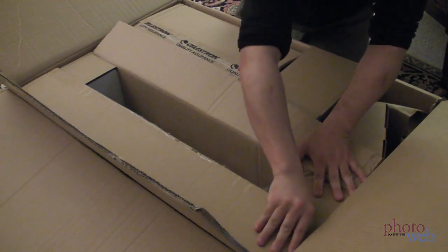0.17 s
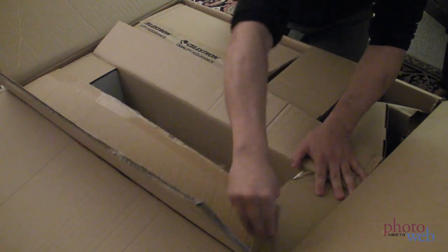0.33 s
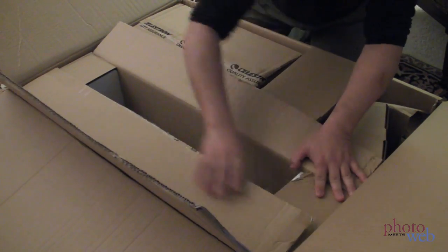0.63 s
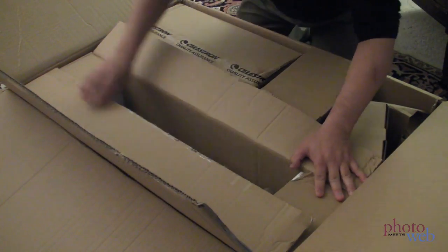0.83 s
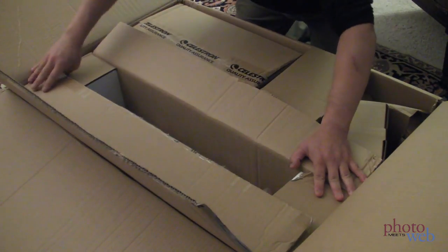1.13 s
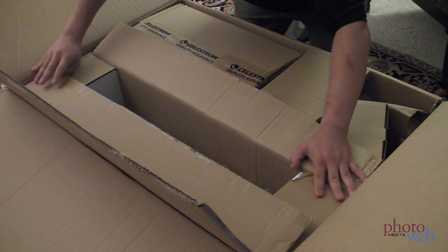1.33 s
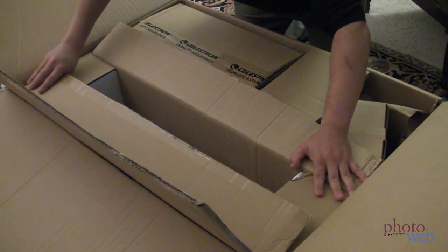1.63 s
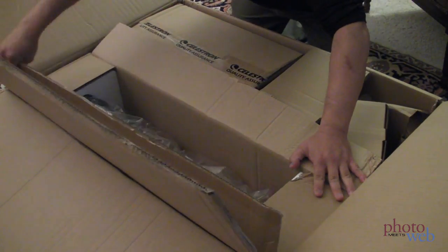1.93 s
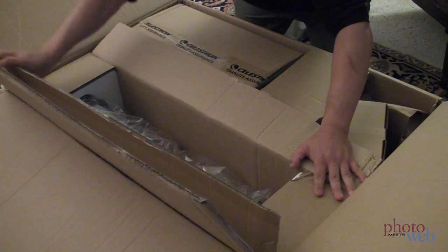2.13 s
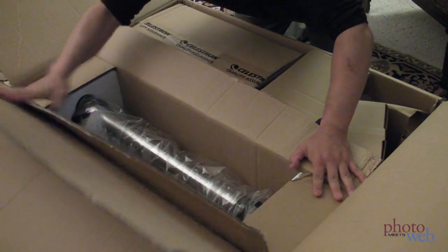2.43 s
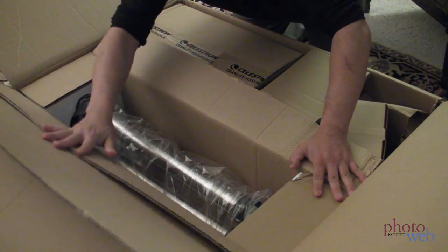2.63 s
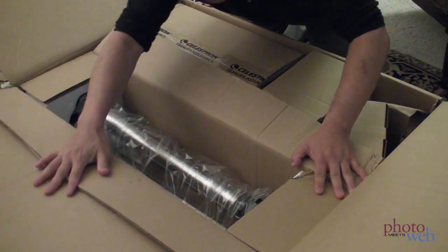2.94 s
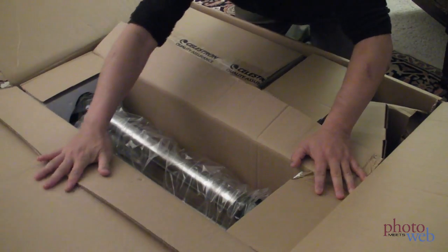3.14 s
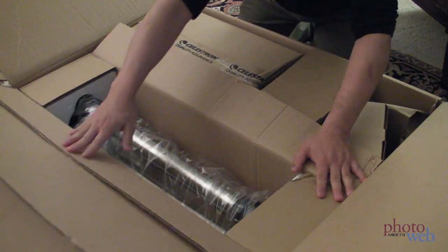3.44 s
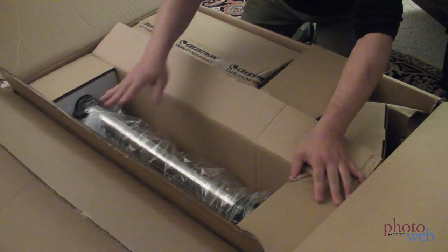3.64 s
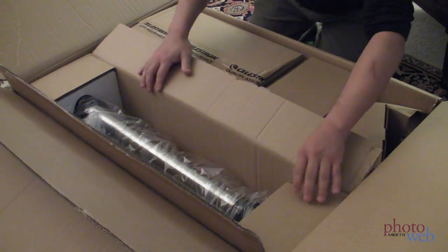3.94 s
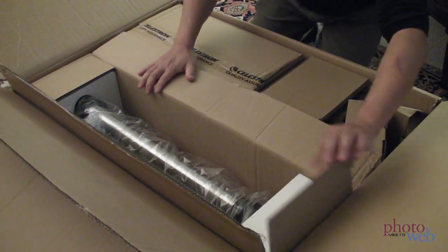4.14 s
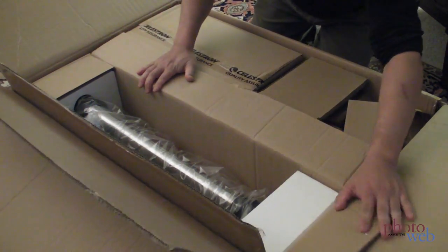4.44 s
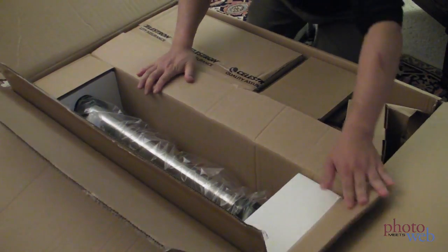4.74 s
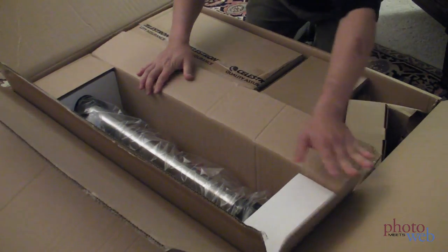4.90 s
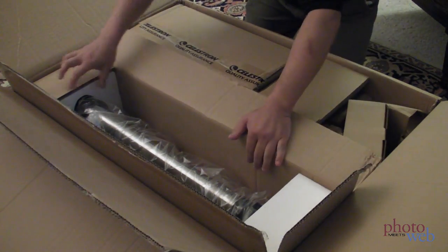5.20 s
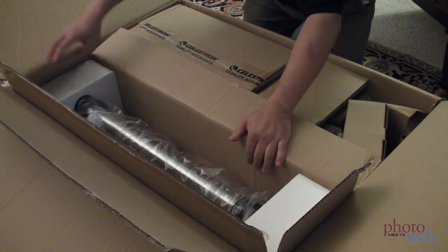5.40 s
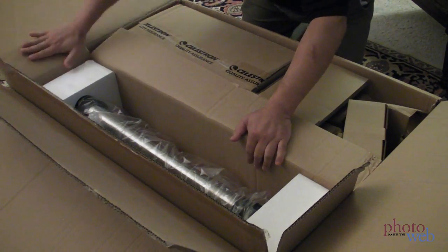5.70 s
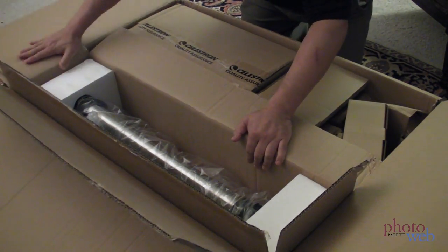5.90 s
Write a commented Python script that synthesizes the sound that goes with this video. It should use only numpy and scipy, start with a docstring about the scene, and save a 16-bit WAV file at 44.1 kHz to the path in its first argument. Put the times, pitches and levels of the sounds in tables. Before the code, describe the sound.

A big cardboard box is opened by hand, heard close. Uneven rubbing strokes carry a papery hiss and hollow boom throughout. Two abrupt boxy cracks, near the start and just before two seconds, shake the flaps. Later come duller thumps, a short falling scrape and bright edge scuffs, with short room reverberation and faint background noise.

```python
"""Opening a cardboard box

Hands open the inner flaps of a large cardboard box, close by in a small room. Sliding board and palms
are noise-like friction; two flaps snap free with loud pops and fingers knock, as ringing panel modes.
Freed flaps rattle in dense collisions, an edge scrapes and scuffs, tape crackles in tiny high ticks,
and a tight edge squeaks by stick and slip. Diffuse reverberation and steady noise lie behind."""
import sys
import numpy as np
from scipy import signal
from scipy.fft import rfft, irfft, next_fast_len
from scipy.io import wavfile
from scipy.ndimage import uniform_filter1d

SR = 44100
rng = np.random.default_rng(int(sys.argv[2]) if len(sys.argv) > 2 else 0)


def dump(signal):
    """Clip the signal to [-1, 1] and save it as 16-bit WAV at the path in sys.argv[1]."""
    limited = np.clip(np.atleast_2d(signal).T, -1, 1)
    pcm = np.round(limited * 32767).astype(np.int16)
    wavfile.write(sys.argv[1], SR, pcm)


N = 267362
TIME = np.arange(N) / SR


def amp(db):
    """Logarithmic level: decibels to amplitude gain."""
    return 10 ** (np.asarray(db) / 20)


def unit(x):
    """Normalisation: scales to rms 1."""
    return x / np.sqrt(np.mean(x ** 2) + 1e-20)


def read(points, hz):
    """Interpolation: reads a (Hz, value) table on a log-frequency axis."""
    f, value = np.transpose(points)
    return np.interp(np.log(hz + 1), np.log(f), value)


def add(mix, s, sound):
    """Superposition: adds a sound into the mix, in place, at time s."""
    part = mix[max(round(s * SR), 0):][:len(sound)]
    part += sound[:len(part)]


def colour(x, spectrum):
    """Linear filtering: weights the spectrum by a table; rms 1."""
    size = next_fast_len(len(x))
    gain = amp(read(spectrum, np.fft.rfftfreq(size, 1 / SR)))
    return unit(irfft(rfft(x, size) * gain, size)[:len(x)])


def wander(per_s):
    """Random modulation: a smooth curve with about per_s new values a second."""
    return unit(np.interp(TIME * per_s, np.arange(N), rng.standard_normal(N)))


def resonate(x, hz, width):
    """Heterodyne resonance along the curve hz: shift down to zero, smooth, shift back."""
    turn = np.exp(2j * np.pi * np.cumsum(hz) / SR)
    r = np.exp(-np.pi * width / SR)
    return 2 * (turn * signal.lfilter([1 - r], [1, -r], x / turn)).real


def slips(per_s, spread_db, smooth, judder_db, judder_per_s):
    """Stick-slip friction: fibres let go in unequal slips, bunched by the judder of the hand."""
    sizes = amp(spread_db * np.minimum(rng.exponential(1, N), 4)) * rng.choice([-1, 1], N)
    grains = unit(sizes * (rng.random(N) < per_s / SR))
    judder = amp(judder_db * wander(judder_per_s))
    return (grains + smooth * rng.standard_normal(N)) * judder


# Colours of rubbed cardboard: coarse rasp, flexing boom, surface hiss and finest fizz.
# Each row: frequency in Hz, relative spectral level in dB per Hz.
RASP_COLOUR = [(250, -32), (450, -0.5), (650, 0), (900, -2), (1300, -3), (1800, -6.5), (2200, -10.5),
               (2700, -18.5), (4500, -21.5)]
BOOM_COLOUR = [(30, -50), (60, -52), (90, -14), (125, 0), (165, 4.5), (260, -3), (360, -0.5), (460, -7),
               (750, -37)]
HISS_COLOUR = [(1800, -15.5), (2900, -9.5), (4000, -1.5), (5200, 1.5), (6800, 2.5), (9000, -0.5),
               (10500, -2.5), (13000, -11)]
FIZZ_COLOUR = [(7500, -64.5), (9600, -2), (10600, 2), (12500, 5.5), (14500, 11), (16000, 6.5)]


def rubbing():
    """Friction radiation: coarse slips shake the panel, fine ones hiss straight off the surface."""
    (rasp, boom, hiss, fizz), (deep_hz, hollow_hz) = strokes()
    coarse = slips(1100, spread_db=1.0, smooth=0.62, judder_db=1.5, judder_per_s=75)
    fine = off_hand(slips(6000, spread_db=4.0, smooth=0.89, judder_db=1.5, judder_per_s=150))
    body = rasp * through_panel(coarse, RASP_COLOUR, hollow_hz, width_hz=370, gap_db=1)
    flex = boom * through_panel(coarse, BOOM_COLOUR, deep_hz, width_hz=133, gap_db=11.5)
    return body + flex + hiss * colour(fine, HISS_COLOUR) + fizz * colour(fine, FIZZ_COLOUR)


# Strokes of palm or board over board. Each row: start in seconds, rise in seconds, fall in seconds,
# levels at full speed of rasp, boom, hiss and fizz in dB, then the deep and the hollow resonance
# of the air gap beneath in Hz, before drift.
STROKES = [ (-.03, 0.028, .13, -41.5, -44.5, -54.5, -54, 288, 760),
           (.03, 0.045, 0.17, -49.5, -49, -51, -48, 340, 710),
           (.12, 0.075, 0.049, -47.5, -54, -54, -49, 375, 915),
           (0.243, .01, 0.062, -50, -51, -59.5, -65, 291, 894),
           (.295, 0.08, 0.018, -32, -43, -40.5, -42, 280, 870),
           (0.368, 0.051, 0.14, -36.5, -57, -49, -48, 261, 890),
           (.53, 0.071, 0.093, -51, -66, -51, -46.5, 373, 825),
           (.66, 0.068, 0.066, -81, -79, -63, -49.5, 298, 765),
           (0.851, 0.025, 0.047, -50.5, -63, -57, -50, 293, 614),
           (.96, 0.019, 0.11, -60, -51, -61, -46, 248, 633),
           (1.05, 0.054, 0.03, -46, -53, -51, -48, 220, 706),
           (1.169, 0.0045, 0.019, -50, -74, -56, -63, 240, 704),
           (1.213, 0.018, 0.075, -48, -49.5, -51.5, -56, 260, 670),
           (1.354, 0.016, 0.2, -50, -50, -75, -53, 286, 665),
           (1.477, 0.039, 0.13, -46.5, -46, -49, -44.5, 315, 586),
           (1.63, 0.052, 0.036, -49.5, -62, -53.5, -48, 274, 800),
           (1.779, 0.033, 0.053, -39.5, -43, -43, -35, 340, 760),
           (1.87, 0.071, 0.071, -45.5, -48, -45.5, -43, 290, 740),
           (2.035, 0.035, 0.075, -52.5, -52.5, -63, -48.5, 256, 820),
           (2.14, 0.07, 0.065, -48, -56.5, -53.5, -48, 223, 1130),
           (2.274, .065, 0.33, -48, -53, -53.5, -47, 260, 1030),
           (2.424, 0.053, 0.068, -40, -38, -43, -36, 312, 593),
           (2.449, 0.14, 0.11, -49, -46, -40.5, -32.5, 192, 674),
           (2.63, 0.067, 0.19, -55.5, -57, -49.5, -42, 290, 720),
           (2.719, 0.079, 0.16, -43.5, -48, -54, -69, 328, 784),
           (2.938, .10, 0.022, -44.5, -47, -51, -50, 334, 820),
           (3.152, 0.054, 0.066, -47, -50.5, -56.5, -62, 330, 694),
           (3.2, 0.11, 0.043, -43.5, -53, -49.5, -51, 340, 690),
           (3.344, 0.056, .10, -42, -46.5, -47, -46.5, 380, 760),
           (3.493, 0.036, 0.15, -48, -50, -49.5, -43, 362, 674),
           (3.641, .015, 0.033, -54, -42, -52, -48, 194, 630),
           (3.62, 0.091, 0.14, -46, -61, -49, -51, 241, 800),
           (3.745, 0.021, 0.035, -48, -39.5, -48.5, -41.5, 315, 620),
           (3.808, 0.037, 0.069, -50, -42.5, -45.5, -45.5, 260, 607),
           (3.89, 0.036, 0.086, -53, -65, -52.5, -55, 260, 625),
           (3.978, 0.087, 0.14, -51, -59, -56, -70, 323, 567),
           (4.215, 0.072, 0.062, -47.5, -50, -55.5, -60, 295, 790),
           (4.299, 0.12, 0.07, -44.5, -53.5, -47.5, -48.5, 275, 696),
           (4.42, .13, 0.074, -46, -51.5, -52, -67, 356, 544),
           (4.635, 0.022, 0.17, -49.5, -51.5, -52, -58, 340, 600),
           (4.679, 0.079, 0.15, -47, -54.5, -49, -51.5, 315, 614),
           (4.86, 0.11, 0.13, -51, -55.5, -51, -46, 292, 694),
           (5.034, 0.068, 0.074, -47.5, -56, -43.5, -40.5, 288, 660),
           (5.14, 0.036, 0.035, -52, -52.5, -67, -70, 325, 656),
           (5.279, 0.019, 0.036, -46.5, -47, -55, -57, 190, 754),
           (5.309, 0.025, 0.046, -44.5, -46, -51, -40, 184, 855),
           (5.35, 0.04, 0.29, -57, -50.5, -57.5, -60, 188, 1030),
           (5.6, 0.054, .03, -53, -53, -48.5, -47, 255, 750),
           (5.655, 0.021, 0.03, -37, -40.5, -41.5, -48, 252, 750),
           (5.66, 0.043, 0.13, -45.5, -48.5, -47, -45, 310, 720),
           (5.76, 0.061, 0.075, -46.5, -48.5, -53, -62, 238, 890),
           (5.872, 0.031, 0.083, -43.5, -49, -50, -51.5, 235, 1110),
           (5.969, 0.093, .12, -45.5, -54, -48, -48.5, 330, 990)]
# Friction while the hands only lean on the board. One row: rasp, boom, hiss and fizz levels in dB.
REST_DB = (-93, -66.5, -67.5, -66)
# Growth with speed. One row: exponents of the speed for rasp, boom, hiss and fizz.
SPEED_LAW = (0.94, 1.25, 1.03, 0.98)


def strokes(gap_drift=0.037):
    """Power law of friction: loudness follows one arch of speed per stroke, and powers add.

    Returns the four friction amplitudes and the air gap's two resonances in Hz."""
    power = amp(REST_DB)[:, None] ** 2 * np.ones(N)
    exponents = np.array(SPEED_LAW)[:, None]
    for start, rise, fall, *db, _, _ in STROKES:
        on = (TIME > start) & (TIME < start + rise + fall)
        arch = np.interp(TIME[on] - start, [0, rise, rise + fall], [0, 1, 0])
        speed = np.sin(np.pi / 2 * arch)
        power[:, on] += (amp(db)[:, None] * speed ** exponents) ** 2
    start, rise, *_, deep_hz, hollow_hz = np.transpose(STROKES)
    drift = np.exp(gap_drift * wander(16))
    gaps = [drift * np.interp(TIME, start + rise, hz) for hz in (deep_hz, hollow_hz)]
    return np.sqrt(power), gaps


def through_panel(x, spectrum, gap_hz, width_hz, gap_db):
    """Coupled resonance: friction shakes the board, and the air gap beneath it resonates."""
    board = colour(x, spectrum)
    return unit(board + amp(gap_db) * resonate(board, gap_hz, width_hz))


def off_hand(x, delay_s=0.000425, sway=0.41, echo_db=-9):
    """Comb filtering: the moving hand mirrors the hiss a moment later, with drifting notches."""
    delay = delay_s * np.exp(sway * wander(7))
    return unit(x + amp(echo_db) * np.interp(TIME - delay, TIME, x))


# Flaps snapping free and knocks on the panels. Each row: start in seconds, peak level of the ring in dB,
# centre of the ring in Hz, its spread in octaves, crack level relative to the ring in dB before halving.
KNOCKS = [ (.146, -27, 920, 0.72, -25), (.183, -24.5, 1000, 0.32, -24), (0.203, -32.5, 1070, 0.72, -21),
          (.333, -3, 1120, 0.51, 4.5), (.336, -5, 250, 0.77, 8), (.373, -13.5, 1080, 0.69, -7),
          (.624, -32, 990, 0.45, -18), (.776, -36, 930, 0.66, -4), (.958, -28.5, 900, .8, -31),
          (.962, -23.5, 1040, 0.39, -27), (0.9627, -17.5, 290, 0.96, -22), (.976, -30.5, 600, 0.53, -24),
          (1.025, -40, 696, .6, -16), (1.069, -32, 856, 1, 3), (1.222, -40.5, 600, 1.9, -10),
          (1.307, -35.5, 890, 1.1, -4), (1.448, -37, 1130, 0.7, -14), (1.51, -26, 410, 1.2, 6.5),
          (1.821, 3, 930, 0.9, -2), (2.102, -38, 920, 1.1, -21), (2.483, -24, 370, .5, -25),
          (2.97, -36, 800, 1.4, -7), (3.383, -30, 366, 0.25, -17), (3.648, -27, 520, 0.89, -24),
          (3.78, -24.5, 293, .66, -26), (3.812, -16, 464, 0.34, -5), (3.841, -28, 606, .73, -16),
          (5.074, -34, 708, 1.16, 6), (5.246, -36.5, 700, 1.4, -12), (5.287, -31.5, 193, .88, 0),
          (5.39, -36, 1210, 0.47, 2), (5.428, -33, 990, 0.46, -6), (5.524, -35.5, 444, 1.2, -20),
          (5.561, -33, 960, 0.76, -16), (5.659, -31.5, 400, 0.61, -15), (5.793, -30, 1160, 0.68, -1)]


def knocks():
    """Impact excitation: each blow sets a panel ringing in its own range of modes."""
    mix = np.zeros(N)
    for start, db, *blow in KNOCKS:
        add(mix, start, amp(db) * knock(*blow))
    return mix


# Bending modes of the box panels. Each row: frequency in Hz, level in dB before the blow's weighting,
# time to decay by 60 dB in seconds.
PANEL_MODES = [(100, 4, 0.062), (134.7, -9.5, 0.155), (173, -3, 0.081), (238.5, 0, 0.036),
               (371.6, 1.5, 0.047), (499, 1, 0.028), (636, 5, 0.034), (845, 2, 0.026), (1088, -1, 0.021),
               (1139, 1, 0.029), (1350, -3.5, 0.034), (1432, 0.5, 0.02), (1790, 6, 0.013),
               (2210, -3, 0.014)]
# The crowd of higher, overlapping modes, and the crack of breaking fibres.
# Each row: frequency in Hz, relative spectral level in dB per Hz (the crowd's before the blow's weighting).
CROWD_COLOUR = [(30, -41), (90, -19), (150, 18), (1000, 10), (1800, -32.5), (2600, -3), (4500, -5.5),
                (9000, -7), (15000, -37)]
CRACK_COLOUR = [(30, -49), (300, -36), (1500, 13), (2800, -9), (4500, 2), (9000, -5.5), (15000, 0)]


def knock(centre_hz, octaves, crack_db, travel_s=0.00047, crowd_db=-11, crowd_s=0.0059,
          crack_s=0.0015, leak_hz=125):
    """Modal ringing with dispersion: bending waves arrive treble first; fibres crack at the start."""
    t = np.arange(SR // 6) / SR
    hz, db, t60 = np.transpose(PANEL_MODES)[:, :, None]

    def favour(f):
        """Selective excitation: modes far from the centre receive less."""
        return 1 / (1 + (np.log2(f / centre_hz) / octaves) ** 2)

    age = np.maximum(t - travel_s * np.sqrt(1000 / hz), 0)
    sides = (-1) ** np.arange(len(PANEL_MODES))[:, None]  # neighbours push the air in opposite senses
    modes = sides * favour(hz) * amp(db - 60 * age / t60) * np.sin(2 * np.pi * hz * age)
    # bass leaks round the open flap
    ring = signal.lfilter(*signal.butter(1, leak_hz, "high", fs=SR), modes.sum(0))
    crowd_spectrum = [(f, level + 10 * np.log10(favour(f))) for f, level in CROWD_COLOUR]
    crowd = colour(rng.standard_normal(len(t)), crowd_spectrum) * np.exp(-t / crowd_s)
    crack = colour(rng.standard_normal(len(t)), CRACK_COLOUR) * np.exp(-t / crack_s)
    return ring / abs(ring).max() + amp(crowd_db) * crowd + amp(crack_db) * .5 * crack


# A freed flap against its neighbours. Each row: start in seconds, rise in seconds,
# decay time constant in seconds, level in dB before the envelope.
RATTLES = [(.345, 0.024, 0.032, -27.5), (1.83, 0.022, 0.033, -21.5)]
# Colour of the collisions. Each row: frequency in Hz, relative spectral level in dB per Hz.
RATTLE_COLOUR = [(30, -29), (60, -19), (130, 1.5), (400, 0.5), (1000, 1), (2000, -4.5), (2700, -9.5),
                 (4500, -12), (8000, -17.5), (15000, -14.5)]


def rattles():
    """Repeated collision: dense hits build as the flap swings out, and die with its shaking."""
    mix = np.zeros(N)
    for start, rise, decay, db in RATTLES:
        age = np.maximum(TIME - start, 0)
        swing = np.minimum(age / rise, 1) * np.exp(-np.maximum(age - rise, 0) / decay)
        hits = slips(1400, spread_db=1.5, smooth=0.32, judder_db=2.8, judder_per_s=150)
        mix += amp(db) * swing * colour(hits, RATTLE_COLOUR)
    return mix


# A flap's edge along the wall. Each row: start in seconds, length in seconds,
# level in dB before the envelope, start and end resonance in Hz.
SCRAPES = [(3.675, .105, -43, 1170, 730)]


def scrapes(width_hz=330):
    """Gap resonance: an edge's slips ring the opening gap beside it, whose pitch falls ever faster."""
    mix = np.zeros(N)
    for start, length, db, start_hz, end_hz in SCRAPES:
        u = np.clip((TIME - start) / length, 0, 1)
        hz = start_hz + (end_hz - start_hz) * u ** 2
        force = slips(1500, spread_db=2, smooth=.7, judder_db=1.2, judder_per_s=100)
        ringing = unit(resonate(resonate(force, hz, width_hz), hz, width_hz))
        mix += amp(db) * np.sqrt(4 * u * (1 - u)) * ringing
    return mix


# Brief skids of a cut edge. Each row: start in seconds, length in seconds, level in dB before the fades.
SCUFFS = [(1.475, 0.01, -43), (1.508, 0.0088, -37), (3.501, 0.0075, -45), (3.543, .011, -43),
          (4.157, 0.0074, -42.5), (5.073, .005, -45), (5.513, 0.024, -28.5), (5.671, 0.009, -28)]


def scuffs():
    """Sliding friction: a cut edge skids for an instant in a bright rasp of filtered noise."""
    spectrum = [(300, 0), (1200, 4.0), (2600, -13.5), (4600, 3.0),  # (Hz, dB)
                (6500, 3.5), (9500, 4.0), (12000, -3.0), (15000, 4)]
    mix = np.zeros(N)
    for start, length, db in SCUFFS:
        noise = rng.standard_normal(SR // 10)[:int(length * SR)]
        bright = colour(noise, spectrum)
        add(mix, start, amp(db) * bright * signal.windows.tukey(len(bright), .4))
    return mix


# Spells of crackling tape. Each row: start in seconds, length in seconds,
# smallest tick level in dB, which random sizes raise.
CRACKLES = [(0.922, .16, -40.5), (1.363, .08, -47.5), (1.8, 0.22, -42.5), (2.041, .05, -42),
            (3.503, .03, -34)]


def crackle(per_s=420, spread_db=4.5):
    """Random impulse process: tape lifts from the board in runs of small ticks."""
    level = sum(amp(db) * (TIME > s) * (TIME < s + length) for s, length, db in CRACKLES)
    sizes = amp(spread_db * np.minimum(rng.exponential(1, N), 3))
    pulses = sizes * (rng.random(N) < per_s / SR)
    return signal.oaconvolve(level * pulses, tick(TICK_HZ))[:N]


# The sharpest ticks of tape and wrapping film. Each row: start in seconds, level in dB.
TICKS = [(.0445, -20), (.932, -27.5), (0.947, -32), (.978, -23), (.998, -44), (1.026, -37), (1.035, -23),
         (1.142, -28.5), (1.716, -29), (2.083, -28), (2.775, -29), (3.104, -36), (4.159, -32)]


def ticks():
    """Snap-through: single creases of tape and film flip over."""
    mix = np.zeros(N)
    for start, db in TICKS:
        add(mix, start, amp(db) * tick(TICK_HZ))
    return mix


TICK_HZ = 13140


def tick(hz, rise_s=0.000092, grit=0.2):
    """Damped oscillation: a flipping crease of thin plastic gives a few very high cycles."""
    t = np.arange(SR // 200) / SR
    envelope = t / rise_s * np.exp(1 - t / rise_s)
    return envelope * (np.sin(2 * np.pi * hz * t) + grit * rng.standard_normal(len(t)))


# Squeaks of a tight edge. Each row: start in seconds, length in seconds, level in dB before the fades,
# start, middle and end frequency in Hz, before jitter.
SQUEAKS = [(1.48, 0.026, -51, 3820, 4460, 5900), (1.585, 0.015, -46, 4020, 4200, 4830),
           (1.594, .029, -50, 5240, 7900, 5040), (1.653, 0.033, -54, 3540, 3840, 4240),
           (1.678, 0.032, -46.5, 3170, 4680, 2880), (1.796, .015, -50, 3800, 6130, 8100)]


def squeaks():
    """Friction oscillation: a tight edge sings briefly at a gliding pitch."""
    mix = np.zeros(N)
    for start, length, db, *glide in SQUEAKS:
        add(mix, start, amp(db) * squeak(length, glide))
    return mix


def squeak(length, glide, jitter=0.049, overtone=0.78):
    """Regular stick and slip: a harmonic tone whose rate follows the speed of the edge."""
    u = np.linspace(0, 1, int(length * SR))
    waver = unit(uniform_filter1d(rng.standard_normal(SR // 10), size=14))[:len(u)]
    hz = np.polyval(np.polyfit([0, .5, 1], glide, 2), u) * (1 + jitter * waver)
    phase = 2 * np.pi * np.cumsum(hz) / SR
    # harmonics above half the sample rate are left out
    tone = sum(overtone ** (k - 1) * np.sin(k * phase) * (k * hz < SR / 2) for k in range(1, 4))
    return unit(tone) * signal.windows.tukey(len(u), .5)


# Decay of the room. Each row: frequency in Hz, time to decay by 60 dB in seconds.
ROOM_T60 = [(100, .36), (300, .39), (900, .45), (2000, .42), (5000, .38), (15000, .32)]
# Colour of the diffuse tail. Each row: frequency in Hz, level in dB before the decay scaling.
TAIL_COLOUR = [(40, -28), (120, -4), (300, -13.5), (1200, -11.5), (3000, -8), (8000, -26), (15000, -18)]
# First reflections. Each row: delay in seconds, level in dB.
WALLS = [(0.0134, -25.5), (0.021, -35), (.028, -19.5), (0.04, -27.5)]


def room(x, build_s=0.0076, count=3, turn_hz=70.04):
    """Reverberation: wall reflections, and diffuse tails in which each band dies at its own speed.

    Three independent noise tails are fed in rotation, so that the reverberation sounds smooth and diffuse."""
    wet = np.zeros(N)
    for k in range(count):
        hz, t, z = signal.stft(rng.standard_normal(SR * 3 // 4), SR, nperseg=256)
        t60 = read(ROOM_T60, hz)[:, None]
        level_db = read(TAIL_COLOUR, hz)[:, None] - 60 * t / t60
        decay = amp(level_db) * np.sqrt(2 * np.log(1000) / (t60 * SR))  # equal energy for any t60
        tail = signal.istft(z * decay, SR, nperseg=256)[1]
        tail *= 1 - np.exp(-(np.arange(len(tail)) / SR / build_s) ** 2)
        turn = (TIME * turn_hz + k / count) % 1
        share = np.sin(np.pi * np.minimum(turn * count / 2, 1))
        wet += signal.fftconvolve(x * share, tail)[:N]
    for delay, db in WALLS:
        add(wet, delay, amp(db) * x)
    return wet


# Colour of the background noise. Each row: frequency in Hz, relative spectral level in dB per Hz.
BACKGROUND_COLOUR = [(25, -54), (50, -44), (80, -8), (140, 3), (600, 5), (1500, -0.5), (3000, -14.5),
                     (15000, -24.5)]


def background(level_db=-60.5):
    """Stationary noise: a faint steady rush under everything."""
    return amp(level_db) * colour(rng.standard_normal(N), BACKGROUND_COLOUR)


def scene():
    """Superposition: all the handling of the box, its reverberation and the background."""
    box = rubbing() + knocks() + rattles() + scrapes()
    box += scuffs() + crackle() + ticks() + squeaks()
    return (box + room(box) + background())[None]


def record(dry, ceiling=0.61, low_cut_hz=55, edge_hz=15620):
    """Transducer limits: deep bass is shed, peaks saturate softly, and the top band is cut off."""
    thin = signal.lfilter(*signal.butter(2, low_cut_hz, "high", fs=SR), dry)
    loud = ceiling * np.tanh(thin / ceiling)
    band_limit = signal.firwin(511, edge_hz, window=("kaiser", 9), fs=SR)
    return signal.oaconvolve(loud, band_limit[None], "same")


dry = scene()
out = record(dry)
dump(out)
```